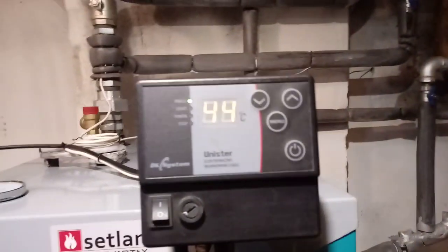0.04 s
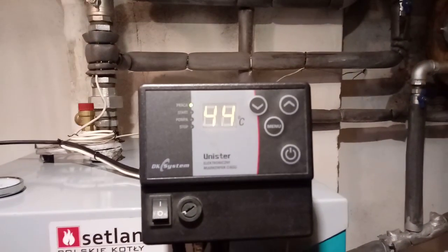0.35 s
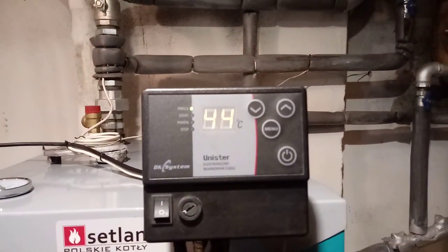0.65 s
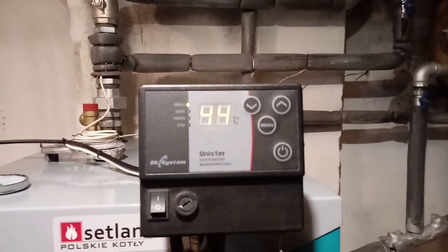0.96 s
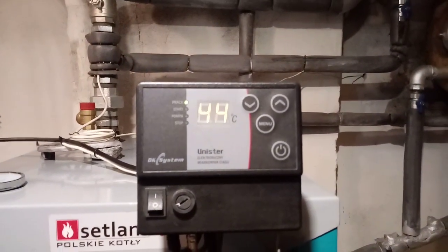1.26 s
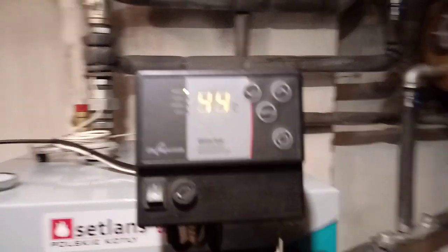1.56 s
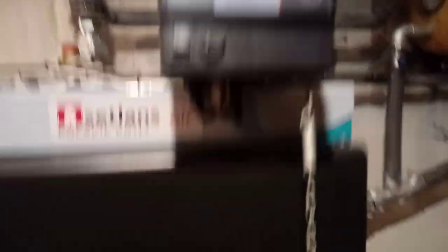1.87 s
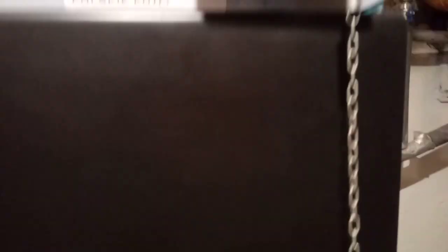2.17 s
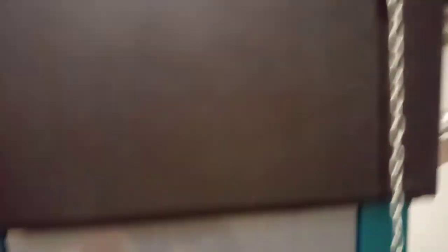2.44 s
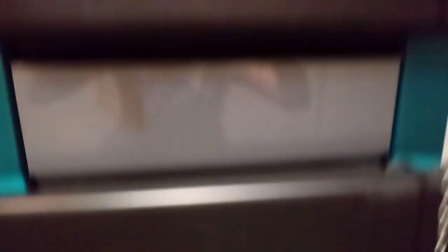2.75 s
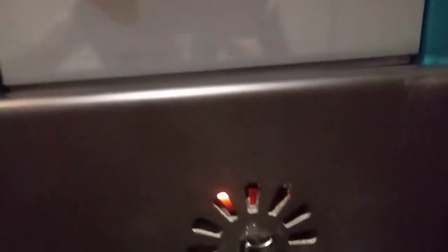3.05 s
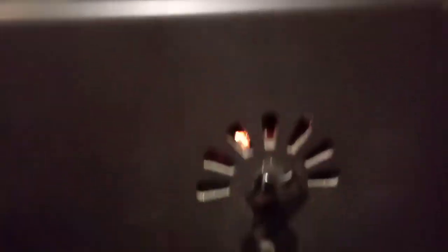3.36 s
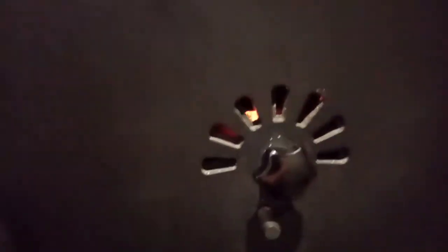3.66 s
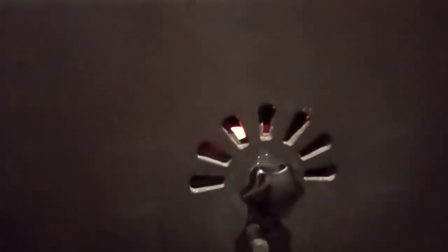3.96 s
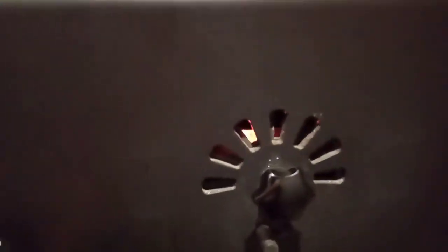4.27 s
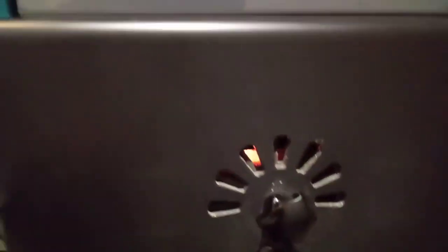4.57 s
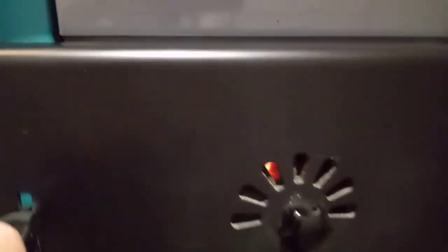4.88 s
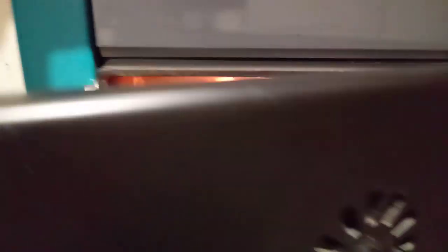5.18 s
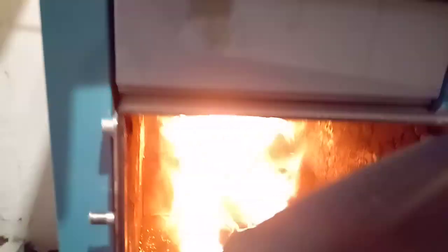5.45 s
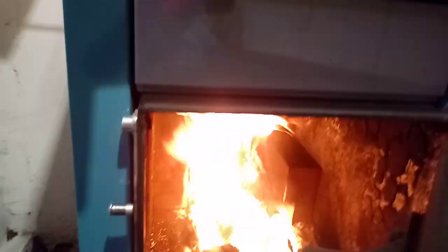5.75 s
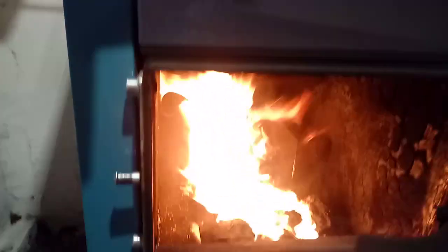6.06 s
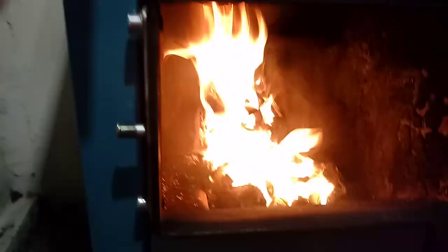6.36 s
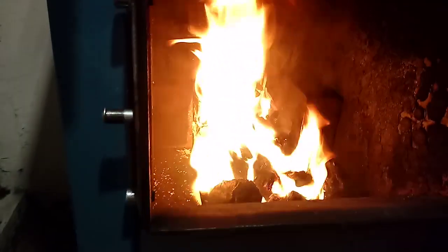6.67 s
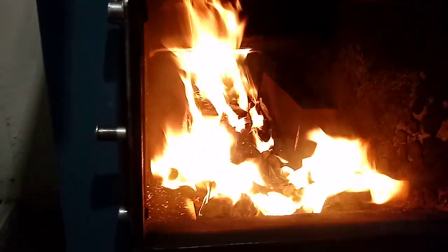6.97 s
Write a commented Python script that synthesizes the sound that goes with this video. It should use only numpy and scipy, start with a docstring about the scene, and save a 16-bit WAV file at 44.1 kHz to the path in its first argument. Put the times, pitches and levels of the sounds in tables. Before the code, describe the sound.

A furnace drones softly amid shoe scuffs, then its steel door scrapes, clanks and squeaks open onto a louder, crackling fire.

```python
"""A solid-fuel furnace drones behind its steel door: turbulence rings firebox, flue and casing.
Someone steps up with a sole slap, gritty scuffs and rustling clothes, and the fire grows louder.
The latch scrapes and clanks free, the hinge sticks and slips in squeaks, and air rushes through the gap.
The open firebox throbs close by; embers snap, wood splits and wood gas whistles.
Light ticks and taps sound now and then over the faint air of a small, bare boiler room."""
import sys
import numpy as np
from scipy import signal
from scipy.fft import rfft, irfft
from scipy.io import wavfile
from scipy.ndimage import uniform_filter1d

SR = 44100
rng = np.random.default_rng(int(sys.argv[2]) if len(sys.argv) > 2 else 0)


def put_to_file(sound):
    """Save the sound as 16-bit audio at rate SR, in the file named by the first command-line argument."""
    columns = np.atleast_2d(sound).T  # one column per channel
    safe = np.clip(columns, -1, 1)
    whole_steps = np.round(safe * 32767)
    wavfile.write(sys.argv[1], SR, whole_steps.astype(np.int16))


N = 309582
TIME = np.arange(N) / SR


def fire():
    """Flames flutter and ring firebox, flue and casing; air rushes in as the door opens."""
    # resonances: centre_hz, width_hz, level_db
    firebox_modes = [(159.4, 13.4, 2), (174.5, 15.2, -4.5), (233.7, 22.3, -6.5)]
    flue_modes = [(61.1, 13, -5.5), (80.6, 16, -6), (113, 40, -9.5)]
    casing_modes = [(281.3, 27, 0.5), (351, 4.9, -1), (379.3, 9.9, -6.5), (438.6, 10, -3)]
    # flame flares, flue gulps: start_s, length_s, added_level_db
    flares = [(5.04, 0.091, -4), (5.29, 0.056, 8.5), (5.669, 0.033, 3.5), (6.071, 0.1, 1.5),
              (6.279, 0.04, 3.5), (6.387, 0.18, -1), (6.735, 0.092, 7.5), (6.884, 0.11, 0.5)]
    gulps = [(.22, 0.62, 3), (1.1, 0.46, 4.5), (2.0, 0.079, 7.5), (2.4, 0.36, -5.5), (3.95, 0.073, 3),
             (4.88, 0.15, 3.5), (5.28, 0.21, -3.5), (5.92, 0.049, 0), (6.15, .06, 0), (6.76, 0.22, -4)]
    # flame spectrum: freq_hz, level_db
    flame_spectrum = [(20, 7), (45, -4), (120, 0), (230, 0.5), (300, -6.5), (430, -2), (540, -2.5),
                      (740, -6.5), (1000, -14), (1500, -21.5), (3000, -25.5)]
    flare, gulp = swells(flares), swells(gulps)
    throb = flare * undb(2 * walk(rate_hz=16))
    drone = cavity(firebox_modes, steadiness=0.96) * throb * gulp ** 0.11
    drone *= nearness(far_db=-71.5, shut_db=-56, open_db=-46.5, lean_db=-42.5)
    rumble = cavity(flue_modes, steadiness=0.9) * gulp * undb(3.5 * walk(rate_hz=11))
    rumble *= nearness(far_db=-64.5, shut_db=-58, open_db=-55, lean_db=-51)
    casing = cavity(casing_modes, steadiness=0.77) * throb ** 0.54
    casing *= nearness(far_db=-79.5, shut_db=-73, open_db=-65, lean_db=-61.5)
    flutter = colour(noise(), flame_spectrum) * flare ** 0.17 * undb(2.4 * walk(rate_hz=18))
    flutter *= nearness(far_db=-74.5, shut_db=-71.5, open_db=-55, lean_db=-56)
    return drone + rumble + casing + eddies(flutter + air_rush(), depth_db=3.5)


def cavity(modes, steadiness):
    """Turbulence rings resonances, rms 1; steadiness (0 to 1) evens out slow swells."""
    ringing = sum(undb(db) * band_noise(hz, width_hz) for hz, width_hz, db in modes)
    power = uniform_filter1d(ringing ** 2, SR // 12) + 1e-9
    return unit(ringing / power ** (steadiness / 2))


def nearness(far_db, shut_db, open_db, lean_db):
    """Gain of one fire voice: ramps during each move, holds between."""
    step_up_s, door_swing_s, lean_in_s = (1.82, 3.06), (4.37, 5.15), (6, 7.6)
    levels_db = [far_db, shut_db, shut_db, open_db, open_db, lean_db]
    return undb(np.interp(TIME, [*step_up_s, *door_swing_s, *lean_in_s], levels_db))


def swells(table):
    """Gain resting at 1, with one swell added per row."""
    rise_s = 0.018
    return 1 + strokes([(start_s, rise_s, length_s, db) for start_s, length_s, db in table])


def eddies(x, depth_db):
    """Eddies swell and sink neighbouring bands independently, about ten times a second."""
    bands = signal.stft(x, nperseg=1024)[2]
    swell = uniform_filter1d(rng.standard_normal(bands.shape), size=7, axis=0)
    swell = unit(uniform_filter1d(swell, size=9, axis=1))
    return signal.istft(bands * unit(undb(depth_db * swell)))[1][:N]


def air_rush():
    """Air drawn past the door: a grainy, hollow hiss."""
    # hiss spectrum: freq_hz, level_db
    rush_spectrum = [(200, -3), (700, 1.5), (1310, 5), (1650, 0.5), (2000, 3.5), (2900, -1), (4000, 1),
                     (5000, 0), (6300, 0), (9000, -19), (12000, -23), (16000, -21.5)]
    hiss = colour(grains(rate_hz=5100, spread_db=1), rush_spectrum)
    return hollow(hiss * draught() * undb(walk(rate_hz=25)), t60_s=0.09, echo_db=-5)


def draught():
    """Draught gain: builds through the first narrow gap, holds, eases with the door wide."""
    start_s, rise_s, hold_s = 4.395, 0.41, 0.8
    shut_db, gap_db, fall_db_per_s = -78, -52, 18.5
    t = TIME - start_s
    opening_db = (gap_db - shut_db) * np.clip(t / rise_s, 0, 1)
    easing_db = fall_db_per_s * np.maximum(t - rise_s - hold_s, 0)
    return undb(shut_db + opening_db - easing_db)


def embers():
    """Embers snap and burning wood splits over a fine sizzle that follows the draught."""
    # ember snaps: start_s, level_db
    snap_events = [(5.046, -31), (5.383, -46), (5.511, -45), (5.945, -46), (6.061, -41), (6.114, -42),
                   (6.226, -46), (6.261, -40), (6.478, -31), (6.891, -24.5)]
    # wood splits: start_s, level_db, t60_s
    cracks = [(5.318, -48, 0.11), (5.385, -44, 0.15), (5.509, -42.5, 0.067), (5.68, -38.5, 0.051),
              (6.839, -60, 0.08), (6.8585, -30.5, 0.034)]
    # spectra: freq_hz, level_db
    ember_spectrum = [(300, 0), (1200, -3.5), (2500, -9), (4500, -1), (7000, 5.5), (10000, 4), (16000, 0.5)]
    split_spectrum = [(300, -7), (750, 3.5), (1150, 4), (1600, 3), (2400, 2.5), (3600, 2.5), (5500, 0.5),
                      (9000, -10), (16000, -7.5)]
    snap_t60_s = 0.014
    sizzle = grains(rate_hz=50, spread_db=3) * draught() * undb(-25.5)
    snaps = bursts([(start_s, db, snap_t60_s) for start_s, db in snap_events])
    crackle = colour(snaps + sizzle, ember_spectrum) + colour(bursts(cracks), split_spectrum)
    return room(crackle, wet_db=-12.5, t60_s=0.21)


def whistles():
    """Jets of wood gas sing briefly, half tone and half hiss."""
    # gas jets: start_s, length_s, pitch_hz, level_db
    jets = [(5.855, 0.12, 2290, -55.5), (6.288, 0.13, 1682, -65)]
    out = np.zeros(N)
    for start_s, length_s, hz, db in jets:
        swell = np.sin(np.pi * np.clip((TIME - start_s) / length_s, 0, 1))
        out += undb(db) * swell * band_noise(hz, width_hz=62)
    return out


def door():
    """Latch, clanks and hinge with their room tails; the small rings share the latch's tail."""
    contacts = room(latch() + clanks() + small_rings(), wet_db=-10.5, t60_s=0.34)
    return contacts + room(hinge(), wet_db=-16.5, t60_s=0.29)


def latch():
    """The latch grinds along its catch."""
    # slide envelope: time_s, level_db
    slide = [(4.385, -67), (4.412, -48), (4.425, -37), (4.51, -31), (4.56, -55.5)]
    # scrape spectrum: freq_hz, level_db
    scrape_spectrum = [(25, -24.5), (95, 4), (160, -1), (240, 7.5), (310, 7.5), (420, 12.5), (700, -1.5),
                       (1500, -1.5), (2400, -2.5), (3300, -0.5), (4600, -13), (6000, -1.5), (9000, -20),
                       (16000, -38)]
    friction = grains(rate_hz=2800, spread_db=-2.5) * gesture(slide)
    return hollow(colour(friction, scrape_spectrum), t60_s=0.03, echo_db=-2.5)


def clanks():
    """Each blow rings the steel door's modes in its own mix; soft contact leaves the high ones quiet."""
    # door modes: freq_hz, level_db, t60_s
    modes = [(236, -18, 0.28), (337, -27, 0.069), (452, -45.5, 0.66), (1350, -37, .09), (1314.6, 3, 0.21),
             (1395, -8, 0.17), (1440, -26.5, 0.19), (1523, -14.5, 0.252), (1724, 0, 0.1),
             (1868, -2.5, 0.21), (2440, -17.5, .25), (2700, -16.5, 0.16), (3154, -22, .17),
             (3440, -43, 0.24), (3830, -39, 0.54), (4400, -35, 0.22), (5300, -26, 0.11), (5680, -16, 0.11)]
    # blows: start_s, ring_db, contact_db, brightness_hz, hand_damping (1 = free)
    blows = [(4.416, -31.5, -47, 2530, 3.4), (4.443, -14, -58, 500, 4), (4.4884, -16, -22, 6000, 1.45),
             (4.495, -22, -48, 3000, 1.3), (4.509, -19.5, -28.5, 4000, 1.83),
             (4.667, -50, -43.5, 4000, 2.2), (4.834, -26.5, -30.5, 1420, 3.1), (4.863, -51, -32, 6000, 1.2),
             (4.886, -25.5, -40, 1110, 6.2), (5.087, -33, -40, 1650, 1.25)]
    # contact spectrum: freq_hz, level_db
    steel_spectrum = [(100, -11), (350, 5), (700, -1.5), (1400, -11.5), (2300, 11), (3000, 13.5),
                      (4500, 10.5), (6000, 0), (9300, -4), (11000, -18), (16000, -29)]
    out, t = np.zeros(N), TIME[:SR // 2]
    mode_hz, mode_db, t60_s = np.transpose(modes)
    onset = np.minimum(t / 0.0011, 1)  # the plate takes a moment to move
    for start_s, ring_db, _, bright_hz, damping in blows:
        detune, mix = rng.standard_normal((2, len(mode_hz)))
        hz = mode_hz * (1 + 0.0042 * detune)
        weights = undb(ring_db + mode_db + 1.5 * mix) / np.sqrt(1 + (mode_hz / bright_hz) ** 6)
        rings = fade(t * damping, t60_s[:, None]) * np.sin(2 * np.pi * hz[:, None] * t)
        add(out, start_s, weights @ rings * onset)
    chatter = 1 + 0.068 * walk(rate_hz=260)  # loose parts against the plate
    contact = bursts([(start_s, db, 0.06) for start_s, _, db, _, _ in blows])
    return out * chatter + colour(contact, steel_spectrum)


def hinge():
    """Dry steel sticks and slips: near-pure squeaks that settle in pitch, with rough overtones."""
    # slips: start_s, rise_s, length_s, level_db, first_hz, settled_hz
    slips = [(4.729, 0.021, 0.023, -13.5, 1894, 1682), (4.793, 0.019, .04, -32.5, 1796, 1695),
             (5.087, 0.01, 0.019, -45, 1468, 1650)]
    overtones_db = [-21.5, -32.5, -37.5, -42, -53, -54.5, -52.5]
    settle_s = 0.015
    out, t = np.zeros(N), TIME[:SR // 4]
    waver = 1 + 0.0077 * walk(rate_hz=500)[:len(t)]
    jitter_rad = [0.98 * walk(rate_hz=380)[:len(t)] for _ in overtones_db]
    for start_s, rise_s, length_s, db, first_hz, settled_hz in slips:
        hz = settled_hz + (first_hz - settled_hz) * np.exp(-(t / settle_s) ** 2)
        phase = 2 * np.pi * np.cumsum(hz * waver) / SR
        squeak = np.sin(phase)
        for harmonic, (overtone_db, jitter) in enumerate(zip(overtones_db, jitter_rad), 2):
            squeak += undb(overtone_db) * np.sin(harmonic * phase + jitter)
        attack = np.sin(np.pi / 2 * np.minimum(t / rise_s, 1)) ** 2
        release = fade(np.maximum(t - length_s, 0), t60_s=0.11)
        add(out, start_s, np.sqrt(2) * undb(db) * attack * release * squeak)
    return out


def small_rings():
    """Light ticks and taps, plus the brief ring of grit under two shoe scuffs."""
    # decaying noise bands: start_s, centre_hz, width_hz, level_db, t60_s
    rings = [(.087, 5520, 1100, -62, 0.25), (.087, 3650, 90, -71.5, 0.64), (.74, 2130, 500, -60, 0.21),
             (1.642, 8300, 1800, -45, 0.015), (1.99, 1210, 220, -60.5, 0.18), (2.1, 1166, 180, -73.5, 0.96),
             (2.29, 1184, 150, -68, 0.62), (2.403, 8100, 2010, -48.5, 0.015), (2.785, 1900, 260, -54, .09),
             (2.845, 1900, 260, -50, 0.1), (3.958, 1290, 128, -49.5, 0.1), (3.96, 7330, 467, -69, 1),
             (3.97, 5260, 700, -70, 0.96), (6.814, 7700, 2000, -44.5, 0.016)]
    out, t = np.zeros(N), TIME[:SR]
    for start_s, hz, width_hz, db, t60_s in rings:
        add(out, start_s, undb(db) * fade(t, t60_s) * band_noise(hz, width_hz)[:SR])
    return out


def shoes():
    """Soles roll grit over concrete; one slaps down, one drags harder until it sticks."""
    # scuffs: start_s, rise_s, length_s, relative_db
    scuff_strokes = [(0.081, .003, 0.026, -55.5), (2.72, 0.024, 0.065, -57), (2.784, 0.002, 0.0056, -43.5),
                     (2.842, 0.003, 0.007, -39.5), (3.201, 0.0033, 0.005, -36), (3.524, 0.0053, 0.051, -43),
                     (3.783, 0.0054, 0.017, -41.5), (6.436, 0.0023, 0.086, -46),
                     (6.669, 0.0023, 0.011, -37.5)]
    # drag envelope: time_s, level_db
    drag_curve = [(3.13, -76), (3.17, -44), (3.19, -34), (3.198, -25), (3.205, -32.5), (3.21, -64)]
    # sandal slap: start_s, level_db, t60_s
    slap_events = [(.58, -29.5, 0.23)]
    # spectra: freq_hz, level_db
    grit_spectrum = [(400, -56), (1100, -14), (1550, -12), (1900, -1), (2150, -10), (2400, -2.5),
                     (2800, -14), (4000, -3.5), (5300, -3), (6400, 1), (7500, -2), (11000, 5), (16000, 3)]
    sole_spectrum = [(500, -37), (1400, -15.5), (2100, -11.5), (2700, -2), (3600, 1), (4600, -10.5),
                     (6000, -4), (7800, 6.5), (9000, -2), (11000, -11), (16000, -22)]
    slap_spectrum = [(150, -40), (400, -2.5), (540, -1.5), (645, 12), (770, -4.5), (930, 2), (2000, -1.5),
                     (3000, -7), (4500, -7), (6000, -3), (9000, -11), (16000, -12)]
    grit = colour(grains(rate_hz=6300, spread_db=2.5) * strokes(scuff_strokes), grit_spectrum) * undb(3.5)
    scuffs = grit + undb(8.5) * resonance(grit, hz=6390, width_hz=97)
    scuffs += undb(6) * resonance(grit, hz=5440, width_hz=580)
    drag = colour(noise() * gesture(drag_curve), sole_spectrum)
    slap = colour(bursts(slap_events), slap_spectrum)
    return (room(scuffs, wet_db=-6.5, t60_s=0.28)
            + room(drag, wet_db=-35, t60_s=0.25)
            + room(slap, wet_db=-14, t60_s=0.37))


def clothes():
    """Cloth brushes in short, fine-grained strokes."""
    # rustles: start_s, rise_s, length_s, relative_db
    rustles = [(2.69, 0.03, 0.095, -45.5), (3.075, .075, 0.078, -46.5), (4.312, .004, 0.0066, -55),
               (4.33, 0.0089, 0.051, -70), (5.175, 0.0075, 0.048, -52)]
    # cloth spectrum: freq_hz, level_db
    cloth_spectrum = [(800, -29), (2900, -32), (4000, -11), (5500, 2), (7500, 3), (10000, -2.5),
                      (13000, -5), (16000, -12.5)]
    friction = grains(rate_hz=17000, spread_db=-4) * strokes(rustles)
    return room(colour(friction, cloth_spectrum) * undb(2), wet_db=-6.5, t60_s=0.28)


def room_air():
    """Faint, steady, hollow noise of the room."""
    # air spectrum: freq_hz, level_db
    air_spectrum = [(20, 15), (100, 4), (290, 15), (360, 20), (500, -8), (1000, -2), (2500, -6), (4000, -6),
                    (5500, -4.5), (8000, -14), (16000, 0.5)]
    return hollow(colour(noise(), air_spectrum) * undb(-64), t60_s=0.12, echo_db=-8)


def room(x, wet_db, t60_s):
    """Close bare walls add a short dense tail."""
    t = TIME[:SR // 2]
    tail = rng.standard_normal(len(t)) * fade(t, t60_s) * (t > 0.004)
    tail = signal.sosfilt(signal.butter(2, 9000, fs=SR, output="sos"), tail)
    return x + undb(wet_db) * convolve(x, tail)


def hollow(x, t60_s, echo_db):
    """Early echoes off hard surfaces ripple the spectrum."""
    t = TIME[:SR // 8]
    echoes = rng.standard_normal(len(t)) * fade(t, t60_s)
    echoes *= undb(echo_db) / np.linalg.norm(echoes)
    echoes[0] = 1  # direct sound
    return convolve(x, echoes)


def undb(db):
    """Decibels to gain."""
    return 10 ** (np.asarray(db) / 20)


def unit(x):
    """Scale to rms 1."""
    return x / np.sqrt(np.mean(x ** 2))


def noise():
    """White noise."""
    return rng.standard_normal(N)


def walk(rate_hz):
    """Smooth random wander, rms 1."""
    hold = int(SR / rate_hz)
    steps = np.repeat(rng.standard_normal(N // hold + 1), hold)
    return unit(uniform_filter1d(steps, hold)[:N])


def grains(rate_hz, spread_db):
    """Tiny random clicks of uneven size, rms 1."""
    clicks = noise() * (rng.random(N) < rate_hz / SR)
    return unit(clicks * undb(spread_db * np.minimum(rng.exponential(size=N), 4)))


def bursts(table):
    """One decaying noise puff per row."""
    out, t = np.zeros(N), TIME[:SR // 2]
    for start_s, db, t60_s in table:
        add(out, start_s, undb(db) * fade(t, t60_s) * rng.standard_normal(len(t)))
    return out


def strokes(table):
    """Envelope that builds, holds and lets go once per row."""
    out, t = np.zeros(N), TIME[:SR // 2]
    for start_s, rise_s, length_s, db in table:
        release = fade(np.maximum(t - length_s, 0), t60_s=0.088)
        add(out, start_s, undb(db) * np.minimum(t / rise_s, 1) * release)
    return out


def gesture(curve):
    """Gain along (time_s, level_db) rows, silent before and after."""
    time_s, db = np.transpose(curve)
    return undb(np.interp(TIME, time_s, db)) * (TIME > time_s[0]) * (TIME < time_s[-1])


def fade(t, t60_s):
    """Exponential decay, 60 dB down at t60_s."""
    return np.exp(-np.log(1000) * t / t60_s)


def add(track, start_s, sound):
    """Mix a sound in at start_s."""
    i = int(start_s * SR)
    track[i:i + len(sound)] += sound[:N - i]


def resonance(x, hz, width_hz):
    """One resonance, gain 1 at its centre."""
    return signal.lfilter(*signal.iirpeak(hz, hz / width_hz, fs=SR), x)


def band_noise(hz, width_hz):
    """Noise in one steep band, rms 1."""
    return unit(resonance(resonance(noise(), hz, width_hz), hz, width_hz))


def response(spectrum, size=4096):
    """Minimum-phase impulse response from (freq_hz, level_db) rows."""
    hz, db = np.transpose(spectrum)
    shape_db = np.interp(np.log(np.fft.rfftfreq(size, 1 / SR) + 1), np.log(hz), db)
    cepstrum = irfft(np.log(undb(shape_db)))
    cepstrum[1:size // 2] *= 2
    cepstrum[size // 2 + 1:] = 0
    return irfft(np.exp(rfft(cepstrum)))


def convolve(x, impulse):
    """Filter by an impulse response scaled to unit energy."""
    return signal.fftconvolve(x, impulse / np.linalg.norm(impulse))[:N]


def colour(x, spectrum):
    """Give white sound a spectrum and keep its power."""
    return convolve(x, response(spectrum))


def scene():
    """Furnace, door and footwork over the room's air, mono."""
    return (fire() + whistles() + embers() + door() + shoes() + clothes() + room_air())[None]


def record(dry):
    """Small microphone: presence peak, weak top with a narrow port resonance, steep cut-off."""
    # microphone response: freq_hz, gain_db
    microphone = [(20, -2), (5000, -3.5), (6500, -1), (7100, -4.5), (8000, -10), (10000, -13.5),
                  (13600, -23.5), (15200, -9.5), (16000, -19)]
    cutoff_hz = 16200
    heard = signal.fftconvolve(dry, response(microphone)[None], axes=1)[:, :N]
    return signal.sosfilt(signal.ellip(10, 0.2, 70, cutoff_hz, fs=SR, output="sos"), heard)


dry = scene()
out = record(dry)
put_to_file(out)
```